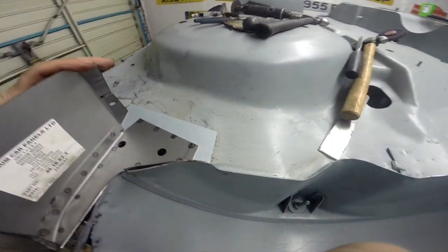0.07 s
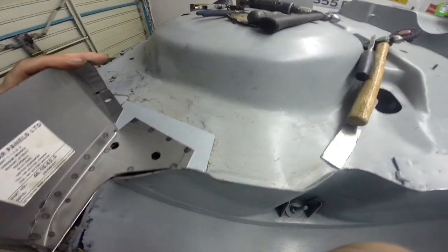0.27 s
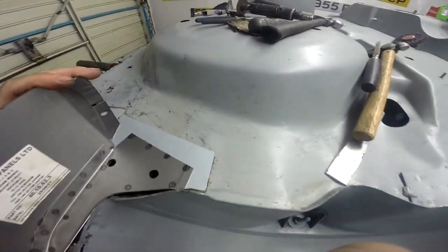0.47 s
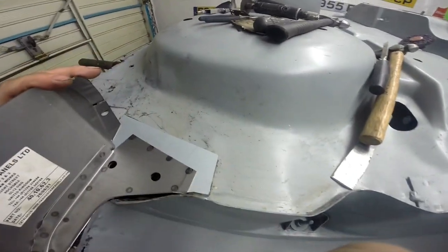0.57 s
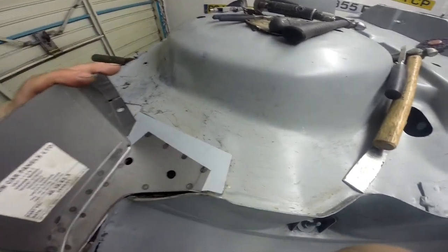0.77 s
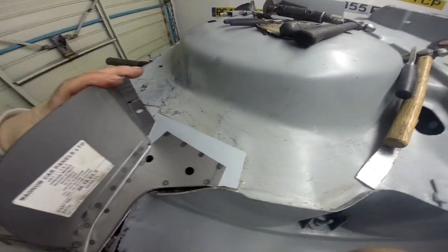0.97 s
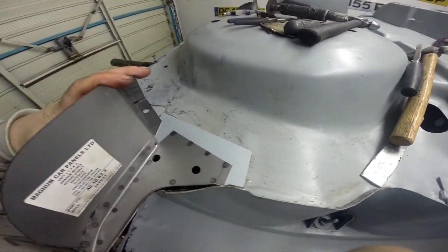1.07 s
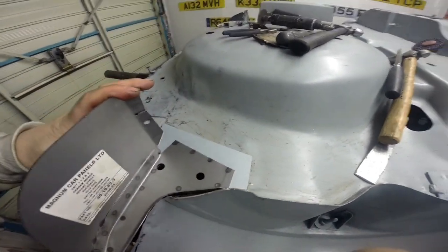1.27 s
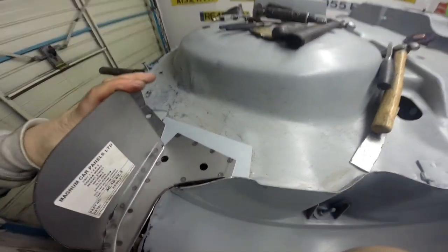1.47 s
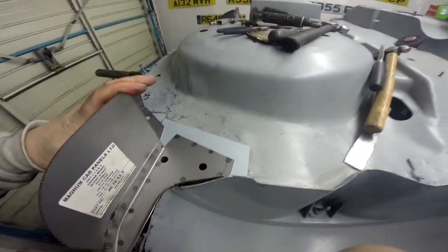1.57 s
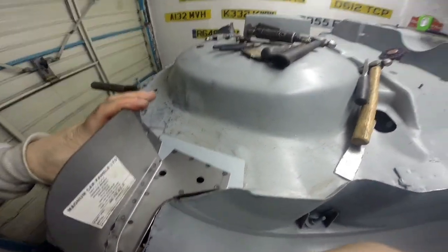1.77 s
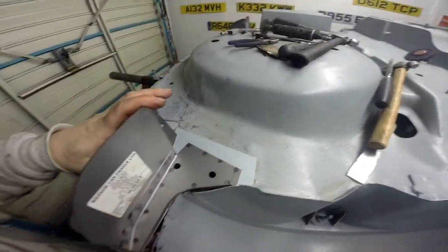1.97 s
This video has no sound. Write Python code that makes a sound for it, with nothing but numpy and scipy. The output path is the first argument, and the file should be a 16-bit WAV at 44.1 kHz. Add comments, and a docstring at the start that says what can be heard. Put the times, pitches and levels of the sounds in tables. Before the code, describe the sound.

A steel panel is fitted against a car body, heard close. A faint rub and tap open, then a loud, sharp metallic knock at 0.23 s rings briefly with a hollow boom. Lighter knocks and rubs follow at 0.45-0.7 s, then a lull. From 1.0 s short scrapes thicken, with a firmer thump, rub and tiny squeak near 1.6 s and a tap at 1.88 s. Quiet workshop hiss and low rumble continue.

```python
"""Steel panel against a car body

A hand-held steel panel is offered up to a bare car body in a workshop, close to a mono microphone.
Stick-slip noise through resonances makes its face rub, its edge scrape and briefly squeak.
Damped modes make its taps and clinks; the shell, knocked once hard and a few times lightly,
adds a noise crack and a dense crowd of modes. Sparse echoes, room noise and a low rumble surround it.
"""
import sys
import numpy as np
from scipy import signal
from scipy.fft import rfft, irfft
from scipy.io import wavfile
from scipy.ndimage import uniform_filter1d

SR = 44100
rng = np.random.default_rng(int(sys.argv[2]) if len(sys.argv) > 2 else 0)


def to_wav(sig):
    """Store sig (one row per channel, or 1-D mono) as 16-bit WAV at the path in sys.argv[1].

    Samples outside -1..1 are clipped; the rate is SR.
    """
    pcm = np.clip(np.atleast_2d(sig), -1, 1) * 32767
    pcm = np.round(pcm).astype(np.int16)
    wavfile.write(sys.argv[1], SR, pcm.T)  # frames by channels


def undo_db(level):
    """Turn decibels back into plain size, where 20 dB means ten times bigger."""
    steps = np.asarray(level, float) / 20
    return 10 ** steps


N = 88200


def evened(x):
    """Normalization: scales a signal to an rms of 1."""
    return x / np.sqrt(np.mean(x ** 2) + 1e-20)


def read(points, hz):
    """Spectral envelope: interpolates (Hz, value) points along log frequency."""
    point_hz, value = np.transpose(points)
    return np.interp(np.log(hz + 1), np.log(point_hz + 1), value)


def add(mix, start, sound):
    """Superposition: adds a sound into the mix from its start in seconds."""
    part = mix[max(round(start * SR), 0):][:len(sound)]
    part += sound[:len(part)]


def resonate(x, hz, width):
    """Resonance by heterodyning: shift hz down to zero, low-pass, shift back; peak gain 1."""
    turn = np.exp(2j * np.pi * hz * np.arange(1, len(x) + 1) / SR)
    r = np.exp(-np.pi * width / SR)
    return 2 * (turn * signal.lfilter([1 - r], [1, -r], x / turn)).real


def slips(count):
    """Stick-slip friction: dense random clicks of uneven strength."""
    slips_per_s, spread_db = 7000, 1.5
    size = undo_db(spread_db * np.minimum(rng.exponential(1, count), 4))
    return size * rng.standard_normal(count) * (rng.random(count) < slips_per_s / SR)


# Strokes of the panel along the shell. Each row: start in seconds, length in seconds,
# face pressure in dB, edge pressure in dB, pitch the edge sings at in Hz.
RUB_STROKES = [(0, 0.095, -50.5, -66.5, 2410), (0.447, 0.059, -52, -55, 2240),
               (0.53, 0.063, -62.5, -57, 3470), (1.006, 0.12, -53, -56.5, 1964),
               (1.094, 0.061, -51.5, -52, 3840), (1.15, .025, -51.5, -52.5, 1950),
               (1.164, 0.051, -45.5, -52.5, 3640), (1.223, 0.13, -51.5, -62, 2600),
               (1.281, 0.038, -44, -56.5, 3960), (1.322, 0.064, -41.5, -49.5, 1976),
               (1.386, 0.17, -48, -57.5, 2430), (1.469, 0.033, -42.5, -52, 3360),
               (1.504, 0.073, -50.5, -49, 2670), (1.572, 0.089, -41.5, -48, 2600),
               (1.605, 0.073, -30, -49.5, 3170), (1.682, .05, -40, -57, 3400),
               (1.725, 0.092, -52.5, -71, 3400), (1.778, .02, -64, -50.5, 4300),
               (1.828, 0.053, -51, -55, 3250), (1.872, 0.0053, -38, -47, 3260),
               (1.881, 0.021, -36, -44, 1980), (1.898, 0.047, -39, -44.5, 3520),
               (1.968, .04, -50.5, -55.5, 3560)]
# Resonances of the panel's face. Each row: frequency in Hz,
# width in Hz (before the widening of both filter passes), relative level in dB.
FACE_RESONANCES = [(252, 58, -10.5), (374, 74, -3), (536.5, 92, -5.5), (628, 104, 2), (770, 46, 0.5),
                   (850, 94, 4.5), (959, 152, -0.5), (1114, 150, -12.5)]
# Resonances of the panel's thin edge. Each row: frequency in Hz, width in Hz, relative level in dB.
EDGE_RESONANCES = [(1830, 210, 3.5), (2685, 750, 4), (3400, 170, 6.5), (4300, 900, 4), (5134, 155, 2),
                   (5820, 250, 1), (8430, 870, -4.5), (9640, 500, -20)]


def rub():
    """Friction-driven resonance: slips excite face and edge in strokes that grip, sag and lift off."""
    lift_s, sag_db = 0.0029, -5.5  # time constant of the release; level change over a stroke
    sing_db, sing_width, sing_step = 2, 260, 1.21  # dB over the edge pressure, Hz, pitch ratio
    face_push, edge_push, sing = np.zeros((3, N))
    face_slips, edge_slips = slips(N), slips(N)
    for start, length, face_db, edge_db, sing_hz in RUB_STROKES:
        t = np.arange(SR // 5) / SR
        # light strokes take longer to grip: seconds, plus seconds per dB of face pressure below -50.5
        grip_s = 0.0057 + 0.002964 * max(-50.5 - face_db, 0)
        lift = np.exp(-np.maximum(t - length, 0) / lift_s)
        shape = np.minimum(t / grip_s, 1) * undo_db(sag_db * t / length) * lift
        add(face_push, start, undo_db(face_db) * shape)
        add(edge_push, start, undo_db(edge_db) * shape)

        drive = slips(len(t))
        song = np.zeros(len(t))
        for hz in (sing_hz, sing_hz * sing_step):
            song += resonate(resonate(drive, hz, sing_width), hz, 2 * sing_width)
        add(sing, start, undo_db(edge_db + sing_db) * shape * evened(song))

    face, edge = np.zeros((2, N))
    for hz, width, db in FACE_RESONANCES:
        wide = 1.14 * width
        face += undo_db(db) * resonate(resonate(face_slips, hz, wide), hz, wide)
    for k, (hz, width, db) in enumerate(EDGE_RESONANCES):
        # neighbours alternate in sign
        edge += (-1) ** k * undo_db(db) * evened(resonate(edge_slips, hz, width))
    edge_band = signal.butter(2, [1300, 12000], "band", fs=SR, output="sos")
    edge = signal.sosfilt(edge_band, edge)
    return face_push * evened(face) + edge_push * evened(edge) + sing


def ring(modes, t, tilt_db=0, rise_cycles=1):
    """Modal synthesis: damped sines swell over some cycles, each beating with a weaker close twin."""
    twin_apart, twin_db = 0.0297, -6.5  # greatest detuning as a fraction of pitch; dB under its mode
    hz, db, t60 = np.transpose(modes)[:, :, None]
    phase, twin_phase, apart = rng.random((3, len(hz), 1))
    rise = 1 - np.exp(-t * hz / rise_cycles)
    level = undo_db(db + tilt_db * np.log2(hz / 1000) - 60 * t / t60)
    twin_hz = hz * (1 + twin_apart * (2 * apart - 1))
    mode = np.sin(2 * np.pi * (hz * t + phase))
    twin = undo_db(twin_db) * np.sin(2 * np.pi * (twin_hz * t + twin_phase))
    return (rise * level * (mode + twin)).sum(0)


# Taps on the held panel itself. Each row: start in seconds, strength in dB,
# flex of its belly in dB relative to the strength, time the flex is held in seconds.
PANEL_TAPS = [(0, -41, -12.5, 0.018), (.37, -58.5, 21.5, 0.16), (0.551, -38.5, -19, .02),
              (.7, -55.5, 15.5, 0.051), (1.176, -39, -15, 0.021), (1.471, -37, -14, .02),
              (1.617, -33, 6.5, 0.044), (1.884, -21.5, -36, 0.019)]
# Modes of the hand-damped panel. Each row: frequency in Hz, relative level in dB, 60 dB decay in seconds.
PANEL_MODES = [(663, -9, 0.051), (641, -9, 0.05), (840, -33, .1), (916, 2, 0.056), (1047, -8.5, 0.027),
               (1160, -16, 0.031)]


def tap(start, db, belly_db, hold_s):
    """Damped vibration: the hand makes the panel's modes die quickly, while its belly flexes for a moment."""
    belly_hz, swell_s, belly_t60 = 233.3, 0.0042, 0.14
    t = np.arange(SR // 2) / SR
    fade_db = -60 * np.maximum(t - hold_s, 0) / belly_t60
    belly = np.sin(2 * np.pi * (belly_hz * t + rng.random()))
    belly *= (1 - np.exp(-t / swell_s)) * undo_db(belly_db + fade_db)
    return start, undo_db(db) * (ring(PANEL_MODES, t) + belly)


# Spectrum of the room noise. Each row: frequency in Hz, relative density in dB per Hz.
ROOM_NOISE_SPECTRUM = [(20, -6.5), (70, -5.5), (110, -9.5), (230, -13.5), (330, -12.5), (500, -23.5),
                       (900, -21), (1500, -26.5), (4000, -32), (8000, -38), (10000, -41.5), (14500, -50)]


def room_noise():
    """Coloured stationary noise: steady workshop air and microphone hiss."""
    spectrum = rfft(rng.standard_normal(N))
    spectrum *= undo_db(read(ROOM_NOISE_SPECTRUM, np.fft.rfftfreq(N, 1 / SR)))
    return undo_db(-54.5) * evened(irfft(spectrum, N))


def rumble():
    """Band-passed noise with slow amplitude modulation: a faint low rumble, slightly lumpy in level."""
    band = signal.butter(2, [25, 109], "band", fs=SR, output="sos")
    low = signal.sosfilt(band, rng.standard_normal(N))
    lumps = uniform_filter1d(rng.standard_normal(N), size=3000)
    lumps = evened(uniform_filter1d(lumps, size=3000))
    return undo_db(-57.5) * evened(low * undo_db(1 * lumps))  # lumps of 1 dB rms


def room(x):
    """Reverberation by convolution: sparse echoes of random sign from the workshop walls."""
    t60, first_s, share = 0.43, 0.008, 0.05  # decay in s, earliest echo in s, share of samples with an echo
    t = np.arange(SR // 2) / SR
    echoes = rng.choice([-1., 1.], len(t)) * (rng.random(len(t)) < share)
    echoes *= (t > first_s) * undo_db(-60 * t / t60)
    echoes = signal.lfilter([.5], [1, -.5], echoes)  # soften the treble
    return signal.fftconvolve(x, echoes / np.linalg.norm(echoes))[:N]


# Spectrum of the dense crowd of shell modes. Each row: frequency in Hz, relative density in dB per Hz.
CROWD_SPECTRUM = [(100, -5), (250, -17), (450, -6), (1000, -10.5), (1700, -10.5), (3300, -17.5),
                  (4400, -12.5), (6500, -21.5), (8700, -25.5), (10000, -36), (12500, -27.5), (14500, -58)]
# Decay of that crowd. Each row: frequency in Hz, 60 dB decay in seconds.
CROWD_DECAY = [(100, 1), (400, 0.51), (1500, 0.27), (4000, 0.27), (8000, 0.24), (12000, 0.026)]


def crowd(t, tilt_db):
    """High modal density: countless close modes sound as noise that swells and dies band by band."""
    rise_cycles = 7.1
    hz, at, z = signal.stft(rng.standard_normal(len(t)), SR, nperseg=256, noverlap=192)
    hz = hz[:, None]
    colour_db = read(CROWD_SPECTRUM, hz) + tilt_db * np.log2((hz + 50) / 1000)
    fade_db = -60 * at / read(CROWD_DECAY, hz)
    rise = 1 - np.exp(-(at + 0.0029) * hz / rise_cycles)  # starts 2.9 ms into the swell
    z = z * undo_db(colour_db + fade_db) * rise
    return signal.istft(z, SR, nperseg=256, noverlap=192)[1][:len(t)] * 6


# The panel meets the shell. Each row: start in seconds, strength in dB, hardness in dB per octave,
# push into the deep modes in dB, clear ring of the higher modes in dB.
SHELL_KNOCKS = [(0.2294, -7, 0.5, -0.5, 0), (.455, -35.5, -0.5, 12.5, -2), (.551, -38, -0.5, -22, -13),
                (.684, -32, 2, 12, 0), (1.102, -38, 1, -3.5, -14), (1.615, -25, -2.5, 6.5, -6)]
# Deep modes of the body shell. Each row: frequency in Hz, relative level in dB, 60 dB decay in seconds.
DEEP_MODES = [(75.47, -4.5, 0.59), (99.9, -2.5, 0.35), (125.8, -11, 0.7), (149.9, -14.5, 1),
              (169, 0.5, 0.41), (188, -20, 1), (228.3, -6, 1), (258, -9, .5), (281.6, -5.5, 0.59),
              (314, -13, 0.44), (364.3, -8.5, 0.34)]
# Middle and bright modes of the shell. Each row: frequency in Hz, relative level in dB,
# 60 dB decay in seconds.
BRIGHT_MODES = [(426, 0, 0.31), (466, -2, 0.29), (514, 1.5, .2), (560, -11, 0.52), (791, -7.5, 0.45),
                (932, -11, 0.21), (1058, -9, 0.37), (1321, -16.5, 0.48), (1413, -11.5, 0.45),
                (1952, -6.5, 0.23), (2277, -13.5, 0.39), (2600, -9.5, 0.32), (4334, 2, 0.16),
                (4700, -36, 0.14), (4855, -7, 0.067), (6313, 0, 0.046), (7637, -1.5, 0.065),
                (10920, -17.5, 0.16)]


def knock(start, db, tilt_db, push_db, clear_db):
    """Impact excitation: a short crack, then the shell rings; a harder contact tilts it brighter."""
    crack_s, chatter_s, onset_s = 0.002, 0.0041, 0.00084  # crack decay, swell of the deep modes, onset ramp
    t = np.arange(int(SR * .9)) / SR
    crack = np.diff(rng.standard_normal(len(t) + 1))  # differencing brightens the noise
    crack *= np.exp(-t / crack_s) * undo_db(-14 + 5 * tilt_db)
    bright = undo_db(-15.5 + clear_db) * ring(BRIGHT_MODES, t, tilt_db, rise_cycles=6.8)
    body = bright + undo_db(-7) * crowd(t, tilt_db) + crack
    deep = undo_db(-19 + push_db) * ring(DEEP_MODES, t)
    return start, undo_db(db) * (body * np.minimum(t / onset_s, 1) + deep * (1 - np.exp(-t / chatter_s)))


# The panel's thin flange clinks as it strikes. Each row: start in seconds, strength in dB.
FLANGE_CLINKS = [(0.2295, -21.5), (.684, -36.5), (1.103, -47)]
# Modes of the flange. Each row: frequency in Hz, relative level in dB, 60 dB decay in seconds.
FLANGE_MODES = [(1085, 2.5, 0.045), (1284, -12.5, 0.33), (1985, -10.5, 0.33), (1944, -5, 0.14),
                (2450, -22, .15), (2150, -3, 0.023), (2450, -11, 0.21), (2650, -2.5, 0.038),
                (3030, -12, 0.081), (4310, -1, 0.048), (4120, -8, 0.039)]


def clink(start, db):
    """Modal vibration of a thin strip: the flange rings thin and high."""
    return start, undo_db(db) * ring(FLANGE_MODES, np.arange(SR // 2) / SR)


# Squeaks of the edge. Each row: start in seconds, length in seconds, level in dB, pitch in Hz.
EDGE_SQUEAKS = [(1.587, 0.031, -42, 5790)]


def squeak(start, length, db, hz):
    """Narrow-band resonance of noise: a brief squeak as the edge slides home."""
    t = np.arange(SR // 10) / SR
    tone = resonate(resonate(rng.standard_normal(len(t)), hz, 170), hz, 300)
    swell = np.sin(np.pi * np.minimum(t / length, 1))
    return start, undo_db(db) * swell * evened(tone)


def scene():
    """Superposition: direct metal sounds, their reverberation, room noise and rumble, alike in two channels."""
    metal = rub()
    events = ((tap, PANEL_TAPS), (knock, SHELL_KNOCKS), (clink, FLANGE_CLINKS), (squeak, EDGE_SQUEAKS))
    for play, rows in events:
        for row in rows:
            add(metal, *play(*row))
    mono = metal + undo_db(-19.5) * room(metal) + room_noise() + rumble()
    return np.array([mono, mono])


def top_cut(x):
    """Nothing passes above the cut-off."""
    return signal.sosfilt(signal.butter(12, 14600, fs=SR, output="sos"), x)


def record(dry):
    """Decorrelation and band limiting: a faint smear of opposite sign per channel, then a low-pass."""
    noise = rng.standard_normal(200) / np.sqrt(200)
    smear = signal.oaconvolve(dry[0], noise)[:N] * undo_db(-39.5)
    pair = dry + np.array([smear, -smear])
    low_pass = signal.firwin(255, 14000, window=("kaiser", 9), fs=SR)
    pair = signal.oaconvolve(pair, low_pass[None], "same")
    return top_cut(pair)


dry = scene()
out = record(dry)
to_wav(out)
```